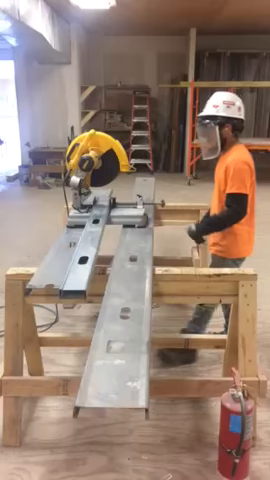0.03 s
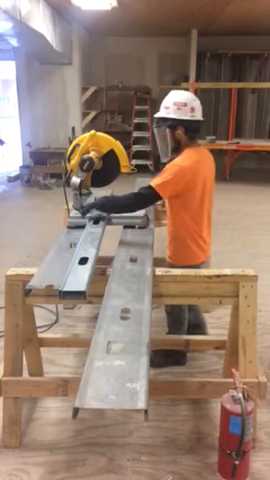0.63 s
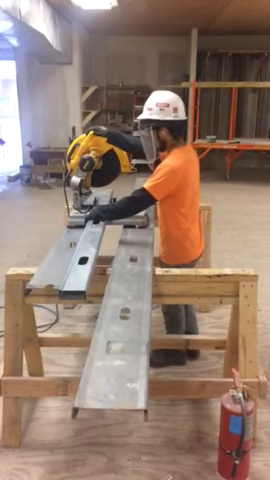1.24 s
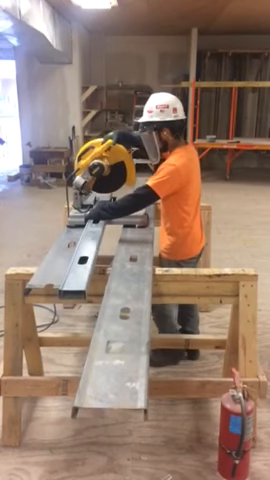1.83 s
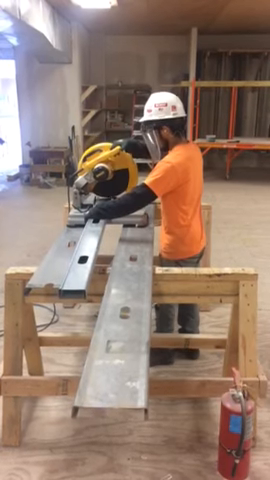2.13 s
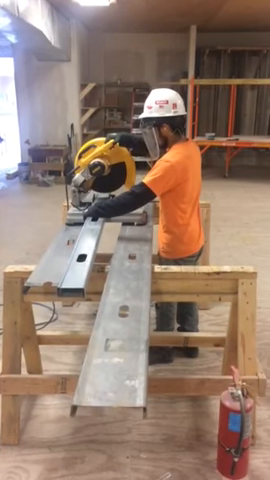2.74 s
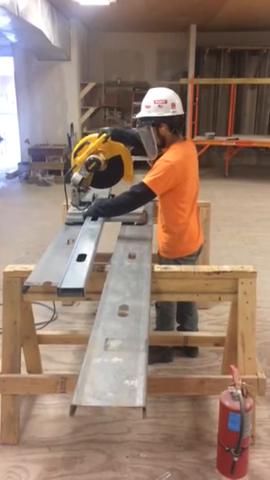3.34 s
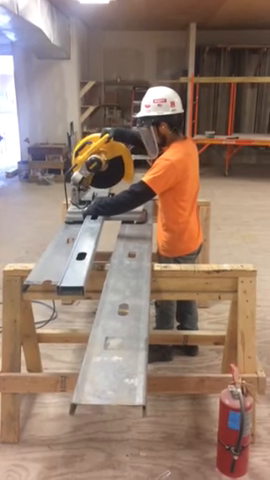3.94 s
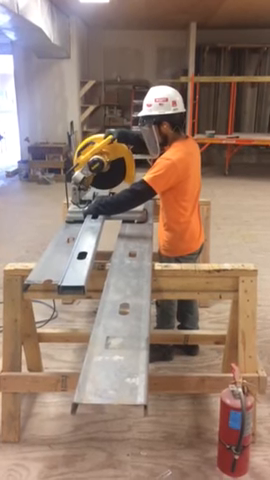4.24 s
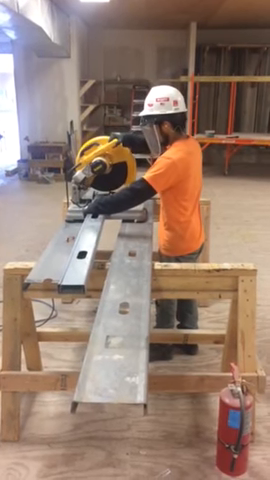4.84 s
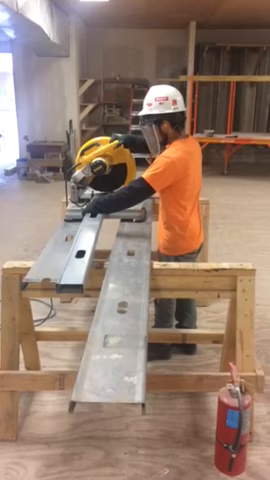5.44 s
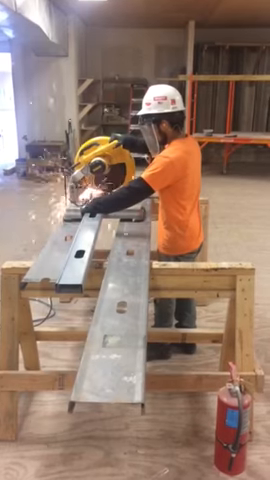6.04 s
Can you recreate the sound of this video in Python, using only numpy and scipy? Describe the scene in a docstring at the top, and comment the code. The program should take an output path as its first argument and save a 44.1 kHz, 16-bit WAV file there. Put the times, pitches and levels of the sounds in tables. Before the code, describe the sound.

Soft footsteps and metal taps in a workshop, then a chop saw starts, whines up to speed and grinds into steel.

```python
"""A large workshop with a chop saw, whose rough spinning wheel grinds through metal.
Over the rumble of the room a worker steps up and nudges a steel stud (a thin wall post) into place.
The switch snaps, the gears knock and the electric current makes the motor growl. The motor then whines
up to speed in a rush of air. The wheel meets the stud and grinds into it, biting once a turn and
making the thin steel ring."""
import sys
import numpy as np
from scipy import signal
from scipy.fft import rfft, irfft
from scipy.io import wavfile
from scipy.ndimage import map_coordinates

SR = 44100
rng = np.random.default_rng(int(sys.argv[2]) if len(sys.argv) > 2 else 0)


def wav_record(signal):
    """Record a signal, one row per channel, as 16-bit PCM in the file named by sys.argv[1]."""
    frames = np.transpose(np.atleast_2d(signal))
    bounded = np.clip(frames, -1, 1)
    # unit amplitude maps onto the largest positive 16-bit level
    quanta = np.round(bounded * 32767).astype(np.int16)
    wavfile.write(sys.argv[1], SR, quanta)


N = 268569
TIME = np.arange(N) / SR
FREQS = np.maximum(np.fft.rfftfreq(N, 1 / SR), 1)

SWITCH_S, KICK_S, CONTACT_S = 3.182, 3.19, 5.567  # switch closes, motor moves, wheel meets steel
MAINS_HZ = 60  # how fast the current from the wall swings back and forth

# Levels are relative. A spectrum says how strong a noise is at each frequency f.
# t60 is the time a sound takes to fade by 60 dB. An order counts vibrations per turn of the wheel.
# spectra of the grinding, the spray of sparks and the rasp of torn grit: f/Hz, level/dB
GRIND_SPECTRUM = [(260, -58), (450, -14), (650, -3.5), (818, -8), (949, 3.5), (1040, -7.5), (1210, -3),
                  (1320, -9), (1930, -0.5), (2410, 3), (2960, -2), (3130, -7), (3810, -6.5), (4520, -9),
                  (7000, -7.5), (9100, -37), (15400, -120)]
SPARK_SPECTRUM = [(2940, 2), (5000, -5), (6160, -9), (6520, -12), (7370, 3), (8220, -1), (9650, 0.5),
                  (10750, 1), (11400, -8), (12500, -12.5), (13600, -14), (14400, -32), (15500, -41)]
RASP_SPECTRUM = [(1900, -11), (2500, -3), (3400, -4.5), (4200, -4), (5400, -2.5), (6800, -4)]
# pitches that the steel stud boosts or swallows: f/Hz, width/Hz, level/dB
STUD_RESONANCES = [(670, 21, -3), (900, 91, 4), (2500, 190, 2.5), (3080, 120, -5), (3300, 200, 2.5),
                   (3900, 350, 3), (4320, 120, 2.5), (7550, 400, 2.5), (8610, 190, 5), (8900, 200, -4),
                   (9380, 350, 4.5), (9830, 320, 6.5), (10180, 170, -8)]
# notes the stud sings: order
SINGING_ORDERS = (11, 15, 15.5, 16, 20, 30, 32, 36, 38, 39, 40, 42, 48, 49, 54, 63, 64, 71, 85)
# the swell of each of those notes: level/dB, loudest t/s, half length/s
SINGING_SWELLS = [(-25, 5.98, .09), (-27.5, 5.85, .3), (-26, 5.99, .07), (-24.5, 5.77, .17),
                  (-38.5, 5.95, .15), (-28, 5.92, .12), (-25, 5.7, .25), (-31, 5.95, .08), (-29, 5.77, .08),
                  (-33, 5.74, .065), (-26.5, 5.84, .2), (-29, 5.63, .09), (-22.5, 5.74, .14),
                  (-30, 5.73, .09), (-26, 5.89, .06), (-30, 5.79, .13), (-28.5, 5.7, .35), (-32, 5.92, .08),
                  (-29.5, 5.72, .1)]
# a quick lurch and a slow climb to top speed: speed gained/(turns per s), time constant/s
SPIN_UP = [(26.22, .155), (36.72, .8)]
# spectra of the fan's roar and of the hiss of air and sparking brushes: f/Hz, level/dB
ROAR_SPECTRUM = [(150, -25.5), (260, -14.5), (350, -12), (445, -15.5), (466, -3), (511, -8.5), (541, 2),
                 (586, -7.5), (642, 0.5), (1010, -5.5), (1070, -7), (1260, -7), (1510, -7), (2110, -10.5),
                 (4000, -17.5), (5200, -77), (8800, -120)]
HISS_SPECTRUM = [(1470, -42), (2500, -0.5), (4300, -1), (5660, 0), (7280, -3), (8040, -3.5), (9370, -4),
                 (10100, -7.5), (12900, -15), (14400, -26), (15500, -54)]
# notes of the wheel guard and motor housing: f/Hz, level/dB, t60/s
HOUSING_NOTES = [(490, -27.5, 0.23), (589.5, -11.5, 0.11), (554, -11.5, 0.046), (640.3, -12, 0.14),
                 (720, -22, 0.15), (746, -24.5, 0.18), (1463, -2, 0.052), (1683, -10, 0.1)]
# thrum of the unbalanced wheel: order, level/dB
WOBBLE_NOTES = [(1, -76), (2, -79), (3, -40.5), (6, -41), (7, -44), (9, -39.5)]
# the fan howling through the guard: f/Hz, width/Hz, level/dB
HOWL_BANDS = [(643, 40, -5), (1128, 14, -5), (1530, 910, 1)]
# whines, each with a casing resonance: level/dB, power of speed, resonance f/Hz, width/Hz, level/dB
GEAR_WHINE = (-48, 2.1, 1990, 400, -30.5)
GEAR_OVERTONE = (-52, 2.1, 4000, 500, -33)
COMMUTATOR_WHINE = (-26.5, 18, 5850, 1150, -33.8)
RIM_WHISTLE = (-36.5, 17, 10400, 700, -50)
# knocks of the loose gears: t/s, level/dB
GEAR_KNOCKS = [(3.190, 0), (3.204, 0), (3.217, 5), (3.231, -13), (3.243, 1.5), (3.252, -3.5), (3.264, 2.5),
               (3.274, -2), (3.286, -8), (3.307, -1), (3.319, -3.5), (3.331, -9), (3.350, -12),
               (3.366, -12), (3.378, -23), (3.440, -7.5), (3.452, -21), (3.464, -9)]
# magnetic buzz of the motor's iron: multiple of twice MAINS_HZ, level/dB
BUZZ_NOTES = [(3, -12.5), (4, -6.5), (5, -8.5), (6, -8), (7, -14)]
# spectrum of the starting motor's shudder: f/Hz, level/dB
SHUDDER_SPECTRUM = [(45, -21), (90, -6), (220, -3.5), (320, -10), (420, -3), (800, 3), (1100, -2.5)]
# squeal of the brushes: f/Hz, width/Hz, level/dB, fade/(dB per s)
SQUEAL_BANDS = [(1870, 840, -12.5, 41), (2890, 110, -19.5, 24), (5560, 180, -25, 8), (5860, 150, -22, 28),
                (7440, 960, -29, -4), (8580, 130, -26, 8), (9850, 90, -33, 12), (10440, 120, -29.5, 18)]
# swells of the low hum as a multiple of the wheel's speed passes f: order, f/Hz, level/dB, width/Hz
HUM_SWELLS = [(2, 117.2, -35, 1.5), (2, 122, -28.5, 1.7), (3, 121, -21, 15)]
# spectrum of the switch's snap: f/Hz, level/dB
SWITCH_SPECTRUM = [(500, -4), (1500, 5), (3000, 3), (5000, -8), (7500, -4), (10500, -10), (14000, -25)]
# taps and clinks of the stud: t/s, level/dB, rise/s, t60/s, brightness/(dB per octave)
STUD_TAPS = [(0.082, -42.5, 0.0016, 0.65, 5), (.465, -54, .004, .15, -6), (.64, -48, 0.006, 0.18, 2.5),
             (.762, -45, 0.004, 0.3, -9), (.80, -51.5, 0.011, 0.99, 7), (1.283, -43.5, .005, 0.2, -10),
             (1.838, -54.5, .003, 0.15, 7), (2.105, -54, 0.0081, 0.53, 7.5), (2.293, -46, .004, 0.13, -4.5)]
# pushes of the stud over the bench: loudest t/s, level/dB, half length/s, f/Hz, width/Hz
STUD_PUSHES = [(0.81, -44, 0.043, 760, 700), (.955, -43.5, 0.051, 447, 110), (1.068, -45, 0.02, 470, 330),
               (1.14, -44, 0.045, 390, 130), (1.238, -47, 0.014, 485, 200), (1.33, -46, 0.024, 560, 600),
               (1.38, -42.5, 0.025, 377, 150)]
# spectra of the clattering stud and of shuffling feet and clothes: f/Hz, level/dB
CLATTER_SPECTRUM = [(350, -2), (600, 1), (875, -10), (948, 4), (1240, 0), (1350, -1), (1480, -0.5),
                    (2160, 1), (2600, -9.5), (3320, -11), (3850, -16.5), (6870, -25.5), (15000, -52)]
SHUFFLE_SPECTRUM = [(200, 9.5), (380, 1), (600, 2), (1000, -3.5), (2000, -13), (4000, -22.5), (8000, -30.5),
                    (13000, -50)]
# pitches that the bench and loose stud boost or swallow: f/Hz, width/Hz, level/dB
BENCH_RESONANCES = [(371.7, 21, 10), (484, 19, 2), (594, 28, 8), (734, 64, -1), (884, 36, 6),
                    (965, 60, 5.5), (1290, 27, -1), (1404, 16, 9), (1470, 26, -2)]
# steps on the plywood floor: t/s, level/dB, f/Hz
FOOTSTEPS = [(0.112, -22, 191), (0.147, -21, 174), (0.234, -17.5, 178), (0.339, -18, 186),
             (0.37, -23.5, 130), (0.708, -21, 138), (0.884, -30, 150), (1.317, -24, 150), (1.391, -24, 173),
             (1.463, -16, 133), (1.512, -18, 127), (1.554, -18.5, 133), (1.831, -19.5, 125)]
# spectra of the room's rumble and the ventilation's hiss: f/Hz, level/dB
RUMBLE_SPECTRUM = [(20, -17), (40, -27), (65, -7.5), (98, -11), (122, 4), (150, -10), (200, -7.5),
                   (260, -19.5), (400, -69)]
VENTILATION_SPECTRUM = [(280, -1), (450, -7), (700, -7), (1100, -8.5), (2000, -16.5), (4000, -25),
                        (8000, -33), (11000, -41), (15000, -48)]


def cutting(turns):
    """The wheel's high spot bites once a turn; the stud bounces at half that rate and rings."""
    bite_lag, rasp_lag = .2, .27  # in turns
    angle = 2 * np.pi * (turns - np.interp(CONTACT_S, TIME, turns) - bite_lag)
    bite = np.cos(angle) + .091 * np.cos(2 * angle) - .74 * np.cos(angle / 2)
    stud = body(STUD_RESONANCES)
    grind = after(CONTACT_S, .039) * from_db(-18.5 + .5 * bite + .99 * drift(240))
    grind *= shaped(grit(turns, repeat=.64), colour(GRIND_SPECTRUM) * stud)
    # the wheel bounces back after its first bite, thinning the sparks
    rebound_db = -9 * np.exp(-((TIME - 5.652) / .027) ** 2)
    sparks = from_db(-20 + rebound_db + 4 * bite + drift(250))
    sparks *= shaped(grit(turns, repeat=.7), colour(SPARK_SPECTRUM) * stud)
    tearing_db = 2.5 * np.cos(angle - 2 * np.pi * rasp_lag)
    rasp = after(CONTACT_S, .023) * from_db(-21.5 + tearing_db) * shaped(chips(), colour(RASP_SPECTRUM))
    singing = after(CONTACT_S, .017) * singing_steel(turns)
    # the first touch snaps against the stud's edge
    snap = from_db(-15.5) * fade(CONTACT_S, t60=.21) * noise(band(4000, 460) * stud)
    first_bite = 1 + 1.9 * np.exp(-since(CONTACT_S) / .013)
    cut = after(CONTACT_S, .00097) * (first_bite * (grind + sparks) + rasp + snap)
    return room_echo(cut, echo_db=-3.5, t60=1) + singing


def grit(turns, repeat, size=720):
    """The same grains on the rim pass each turn (the share `repeat`), mixed with fresh cracks."""
    rim = irfft(np.exp(2j * np.pi * rng.random(size // 2 + 1)), size)
    passing = rms_one(map_coordinates(rim, [turns * size % size], order=3, mode="grid-wrap"))
    return np.sqrt(repeat) * passing + np.sqrt(1 - repeat) * white()


def chips(per_second=7000, spread_db=2.5):
    """Chips of steel and grit break away as tiny clicks of uneven size."""
    sizes = from_db(spread_db * np.minimum(rng.exponential(1, N), 4)) * rng.choice([-1, 1], N)
    return rms_one(sizes * (rng.random(N) < per_second / SR))


def singing_steel(turns):
    """As the cut deepens, one note of the stud after another swells and dies away."""
    out = np.zeros(N)
    for order, (db, t, length) in zip(SINGING_ORDERS, SINGING_SWELLS):
        swell = from_db(db) / (1 + ((TIME - t) / length) ** 2)
        out += swell * tone(order * turns, blur=.5 + .006 * order, blur_hz=10 + .35 * order)
    return out


def wheel_speed():
    """Turns per second: the wheel speeds up, then the cut brakes it ever harder."""
    free = sum(gained * (1 - np.exp(-since(KICK_S) / lag)) for gained, lag in SPIN_UP)
    return free - 9.2 * since(CONTACT_S) ** 2


def motor(speed, pace, turns):
    """The running motor and wheel; fan, hiss and whines drop once the wheel is in the steel."""
    in_steel = after(CONTACT_S, .0052)
    fan_gain, hiss_gain = from_db(-4.5 * in_steel), from_db(-12 * in_steel)
    airflow = from_db(-23.5) * hiss_gain * np.minimum(pace / .8, 1) ** 4.4
    out = fan_gain * fan_roar(pace)
    out += hiss(pace, turns, airflow)
    out += wheel_wobble(pace, turns)
    out += air_rush(pace, turns, airflow)
    out += fan_gain * fan_howl(pace)
    out += hiss_gain * whines(speed, pace, turns)
    running = .16 * after(SWITCH_S, .00066) + .7 * after(KICK_S, .0012)
    return running * out


def fan_roar(pace):
    """The cooling fan roars, and the housing drones along."""
    level_db = -21.5 - (1 - pace)
    roar = from_db(level_db + 1.38 * drift(8.1)) * noise(colour(ROAR_SPECTRUM))
    drone = from_db(level_db - 10) * shaped(housing(white()), FREQS > 400)
    return roar + drone


def hiss(pace, turns, airflow):
    """The brushes (the motor's sliding contacts) spark at first; then air hisses off the wheel."""
    rise_s, hold_s = .059, .065
    sparks = from_db(-25) * after(SWITCH_S, rise_s) * fade(SWITCH_S + rise_s + hold_s, t60=.93)
    # the slow motor sparks at each peak of the current
    pulsing = 1 + .14 * (1 - pace) * np.cos(4 * np.pi * MAINS_HZ * TIME)
    swish = 1 + .045 * np.cos(2 * np.pi * turns)
    level = np.hypot(sparks, airflow) * from_db(drift(24)) * pulsing * swish
    return level * noise(colour(HISS_SPECTRUM))


def wheel_wobble(pace, turns):
    """The unbalanced wheel thrums, louder as it speeds up."""
    notes = sum(from_db(db) * tone(order * turns, blur=.11, blur_hz=4.5) for order, db in WOBBLE_NOTES)
    return pace ** 4 * notes


def air_rush(pace, turns, airflow):
    """Air rushes through the vents and off the rim, rising in pitch with the speed."""
    vents = from_db(-28.5) * np.minimum(pace / .64, 1) ** .43 * tone(104 * turns, blur=30, blur_hz=1110)
    rim = from_db(-19) * airflow * pace ** 4 * tone(165 * turns, blur=30, blur_hz=2200)
    return vents + rim


def fan_howl(pace, guard_hz=552):
    """Near top speed the fan howls through the guard, which adds a hollow note."""
    howl = sum(from_db(db) * noise(band(hz, width)) for hz, width, db in HOWL_BANDS)
    hollow = tone(guard_hz * TIME, blur=.9, blur_hz=6.7)
    return from_db(-25.5) * pace ** 8.4 * howl + from_db(-30.5) * pace ** 6 * hollow


def whines(speed, pace, turns):
    """Gear teeth, the commutator (the bars under the brushes) and the rim whine ever higher."""
    gear, bars, rim = 43, 117.15, 197.1  # orders

    def strength(whine, order):
        """A whine grows with speed and swells as its pitch passes a resonance of the casing."""
        db, power, hz, width, swell_db = whine
        swell = from_db(swell_db) / (1 + (2 * (order * speed - hz) / width) ** 4)
        return np.hypot(from_db(db) * pace ** power, swell)

    # a second note, two orders lower, broadens the gear whine
    out = sum(strength(GEAR_WHINE, k) * tone(k * turns, blur=1.8, blur_hz=60) for k in (gear - 2, gear))
    out += strength(GEAR_OVERTONE, 2 * gear) * tone(2 * gear * turns, blur=8, blur_hz=250)
    bars_gain = strength(COMMUTATOR_WHINE, bars)
    out += bars_gain * tone(bars * turns, blur=.3, blur_hz=12)
    out += bars_gain * from_db(-17) * tone(2 * bars * turns, blur=12, blur_hz=200)
    return out + strength(RIM_WHISTLE, rim) * tone(rim * turns, blur=.4, blur_hz=18)


def gear_knocks():
    """Loose gears knock as the motor lurches, making the housing ring."""
    ringing = housing(clicks(GEAR_KNOCKS))
    # the blows are cushioned and the guard gives off little bass, so middle pitches remain
    thud = signal.sosfilt(signal.butter(3, [510, 860], "band", fs=SR, output="sos"), ringing)
    clank = signal.sosfilt(signal.butter(2, [1300, 1900], "band", fs=SR, output="sos"), ringing)
    return room_echo(from_db(3.5) * thud + from_db(-19.5) * clank, echo_db=-13, t60=.8)


def housing(force):
    """The guard and motor housing ring at their own notes when pushed."""
    return sum(from_db(db) * ring(force, hz, t60) for hz, db, t60 in HOUSING_NOTES)


def starting_growl(current):
    """The surge of current makes the iron buzz, the motor shudder and the brushes squeal."""
    buzz = sum(from_db(db) * tone(k * 2 * MAINS_HZ * TIME, blur=.85, blur_hz=7.5) for k, db in BUZZ_NOTES)
    shudder = from_db(1) * noise(colour(SHUDDER_SPECTRUM))
    squeal = sum(from_db(9 + db - fall * since(KICK_S)) * noise(band(hz, width))
                 for hz, width, db, fall in SQUEAL_BANDS)
    return current * from_db(-12.5) * (buzz + shudder + squeal * after(3.21, .025))


def hum(speed, current):
    """The iron hums with the current, swelling and dipping as a multiple of the speed nears its pitch."""
    power = (from_db(-18.5) * current) ** 2
    for order, hz, db, width in HUM_SWELLS:
        power += (from_db(db) / (1 + (2 * (order * speed - hz) / width) ** 2)) ** 2
    wave = tone(2 * MAINS_HZ * TIME, blur=.023, blur_hz=9.8)
    wave += from_db(-19.5) * tone(MAINS_HZ * TIME, blur=1, blur_hz=19)
    steadying = from_db(-19 * since(CONTACT_S))  # the deepening slot steadies the wheel
    return after(KICK_S, .03) * steadying * np.sqrt(power) * wave


def switch():
    """The switch closes with a bright snap."""
    return from_db(-23) * after(SWITCH_S, .0003) * fade(SWITCH_S, t60=.3) * noise(colour(SWITCH_SPECTRUM))


def stud_taps():
    """The stud taps and clinks as it is handled."""
    out = np.zeros(N)
    for t, db, rise, t60, brightness in STUD_TAPS:
        touch = from_db(db) * after(t, rise) * fade(t + rise, t60)
        out += touch * noise(colour(CLATTER_SPECTRUM) * from_db(brightness * np.log2(FREQS)))
    return out


def stud_dragging():
    """The stud groans as it is pushed over the bench."""
    out = np.zeros(N)
    for t, db, length, hz, width in STUD_PUSHES:
        push = from_db(db) * np.exp(-.5 * ((TIME - t) / length) ** 2)
        out += push * noise(band(hz, width) * colour(CLATTER_SPECTRUM) ** .5)
    return out


def footsteps():
    """Each step makes the floor boom briefly."""
    return sum(ring(clicks([(t, db)]), hz, t60=.068) * after(t, .0091) for t, db, hz in FOOTSTEPS)


def shuffling(busy_db):
    """Feet and clothes rustle as the worker moves."""
    return from_db(-44 + busy_db + drift(26)) * noise(colour(SHUFFLE_SPECTRUM) * body(BENCH_RESONANCES))


def room_noise(busy_db):
    """The room rumbles, the floor rumbles under the worker, and the ventilation hisses."""
    room = from_db(-39 - 2 * after(KICK_S, .1))  # a little weaker while the saw runs
    floor = from_db(-37.5 + busy_db)
    rumble = np.hypot(room, floor) * noise(colour(RUMBLE_SPECTRUM))
    return rumble + from_db(-51.5) * noise(colour(VENTILATION_SPECTRUM))


def room_echo(x, echo_db, t60):
    """The sound itself, followed by a fading wash of echoes."""
    t = TIME[:SR]
    tail = rng.standard_normal(SR) * from_db(-60 * t / t60) * (t > .011)
    return x + from_db(echo_db) * signal.fftconvolve(x, tail / np.linalg.norm(tail))[:N]


def from_db(db):
    """Turn decibels into a number to multiply by."""
    return 10 ** (np.asarray(db) / 20)


def rms_one(x):
    """Scale a signal so that its average strength (rms) is 1."""
    return x / np.sqrt(np.mean(x ** 2) + 1e-20)


def since(start):
    """Seconds since start, 0 before it."""
    return np.maximum(TIME - start, 0)


def after(start, rise):
    """0 until start, then climbing to 1 in `rise` seconds."""
    return np.clip((TIME - start) / rise, 0, 1)


def fade(start, t60):
    """1 until start, then dying away."""
    return from_db(-60 * since(start) / t60)


def clicks(events):
    """One click for each pair of time and level."""
    out = np.zeros(N)
    for t, db in events:
        out[int(t * SR)] = from_db(db)
    return out


def white():
    """Fresh noise, equally strong at all frequencies."""
    return rng.standard_normal(N)


def shaped(x, gain):
    """Turn each frequency up or down by its gain, then scale to strength 1."""
    return rms_one(irfft(rfft(x) * gain, N))


def noise(gain):
    """Fresh noise shaped by a gain for each frequency."""
    return shaped(white(), gain)


def drift(rate_hz):
    """A random wander, mostly slower than rate_hz."""
    return noise(1 / (1 + (FREQS / rate_hz) ** 2))


def colour(spectrum):
    """The gain at each frequency for a spectrum table, falling steeply past its ends."""
    hz, db = np.transpose(spectrum)
    octaves_outside = np.maximum(np.log2(hz[0] / FREQS), 0) + np.maximum(np.log2(FREQS / hz[-1]), 0)
    return from_db(np.interp(np.log(FREQS), np.log(hz), db) - 62 * octaves_outside)


def band(hz, width):
    """A hump of gain around one frequency, 1 on top."""
    return 1 / (1 + (2 * (FREQS - hz) / width) ** 2)


def body(resonances):
    """Gain of an object that boosts or swallows sound near certain pitches."""
    return from_db(sum(db * band(hz, width) for hz, width, db in resonances))


def ring(x, hz, t60):
    """Each click in x starts a pure note that dies away."""
    decay, step = from_db(-60 / (t60 * SR)), 2 * np.pi * hz / SR
    return signal.lfilter([0, np.sin(step)], [1, -2 * decay * np.cos(step), decay ** 2], x + 1e-18)


def tone(cycles, blur, blur_hz):
    """A note that flutters at random; a large blur turns it into a band of noise."""
    flutter = 1 + blur * (drift(blur_hz) + 1j * drift(blur_hz))
    return np.real(flutter * np.exp(2j * np.pi * cycles)) / np.sqrt(.5 + blur ** 2)


def scene():
    """The wheel's speed drives the saw's sounds; the worker and the room lie underneath."""
    speed = wheel_speed()
    pace = speed / sum(gained for gained, lag in SPIN_UP)  # share of top speed
    turns = np.cumsum(speed) / SR
    current = after(SWITCH_S, .16) * (1 - pace) ** 1.62  # surges, then falls as speed builds
    saw = switch() + gear_knocks() + starting_growl(current)
    saw += motor(speed, pace, turns) + hum(speed, current) + cutting(turns)
    busiest_s = 1.21  # the worker gets louder stepping up, then settles
    busy_db = -3 * np.maximum(busiest_s - TIME, 0) - 9 * since(busiest_s)
    background = room_noise(busy_db) + shuffling(busy_db) + stud_taps() + stud_dragging() + footsteps()
    return (saw + background)[None]


def record(dry, start_s=.083, cutoff_hz=15700):
    """Sound begins after a moment of silence; peaks are rounded and the highest treble is cut."""
    rounded = dry / (1 + dry ** 6) ** (1 / 6)
    treble_cut = signal.ellip(10, .1, 90, cutoff_hz, fs=SR, output="sos")
    return signal.sosfilt(treble_cut, rounded * after(start_s, .001))


dry = scene()
out = record(dry)
wav_record(out)
```